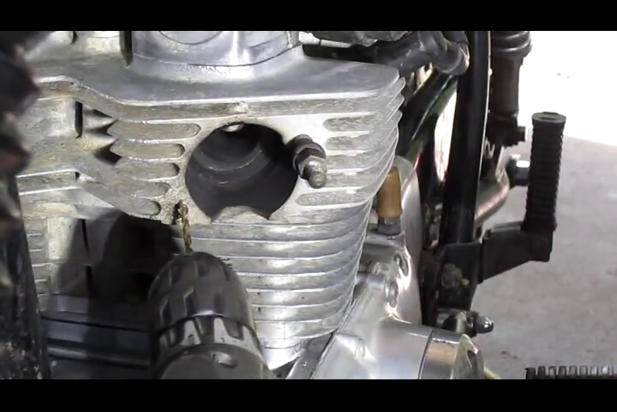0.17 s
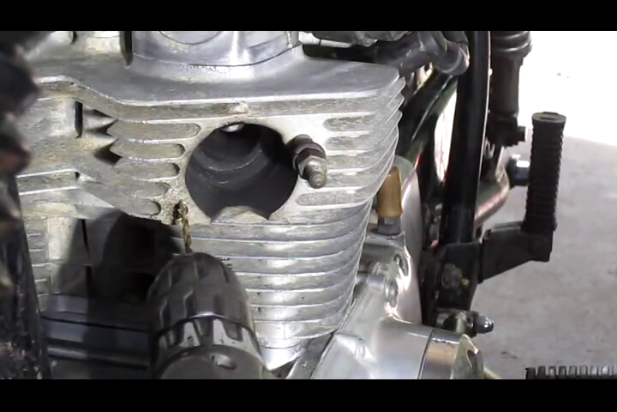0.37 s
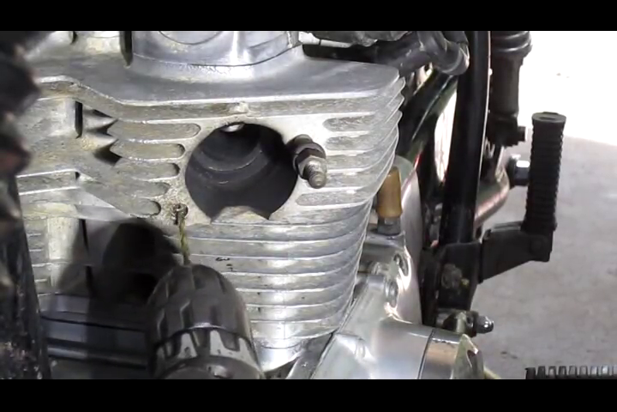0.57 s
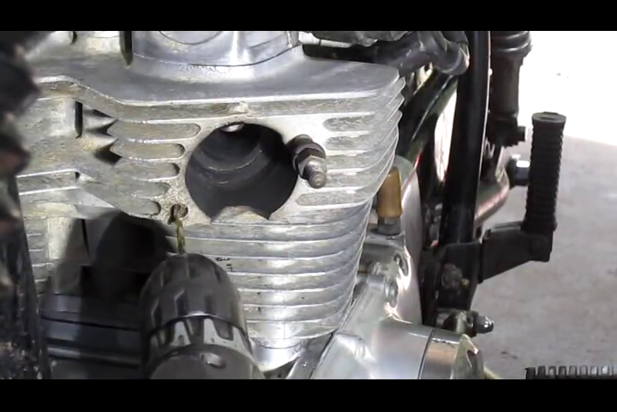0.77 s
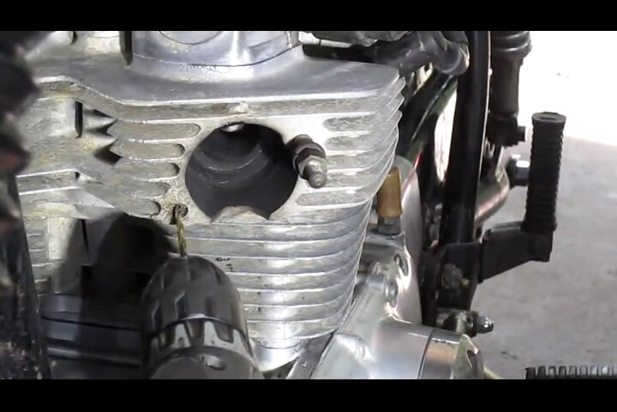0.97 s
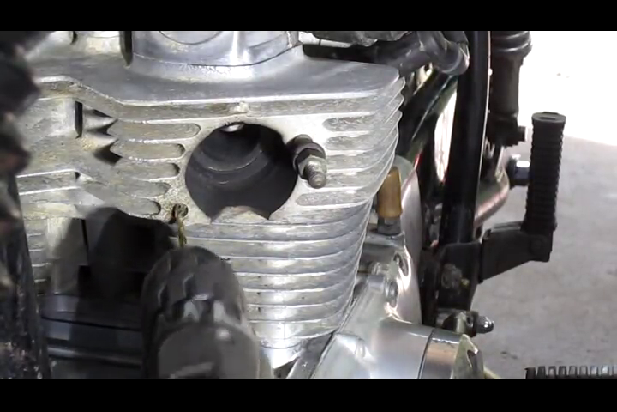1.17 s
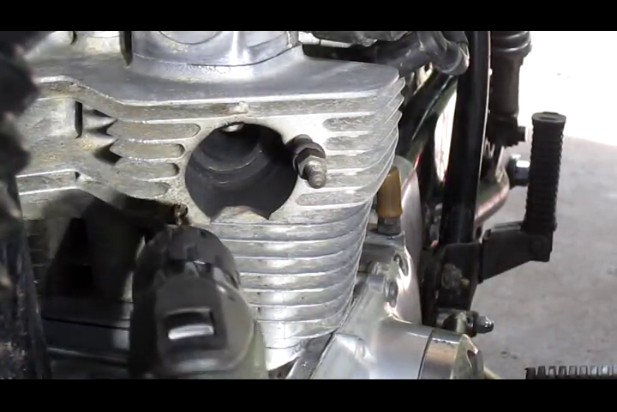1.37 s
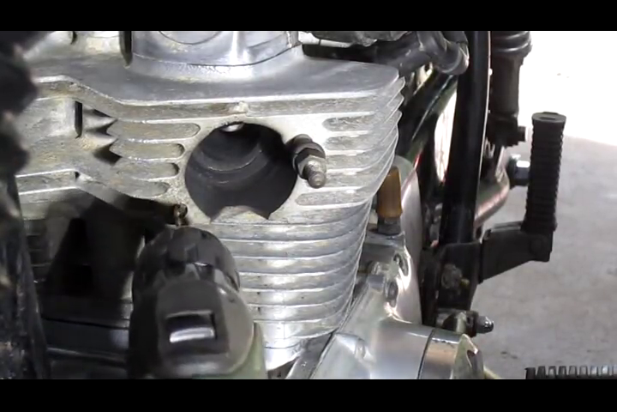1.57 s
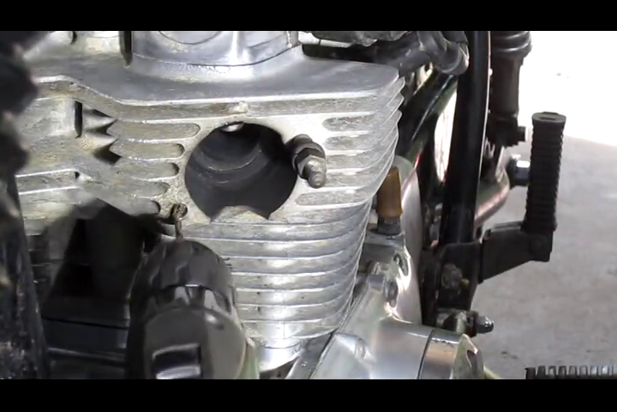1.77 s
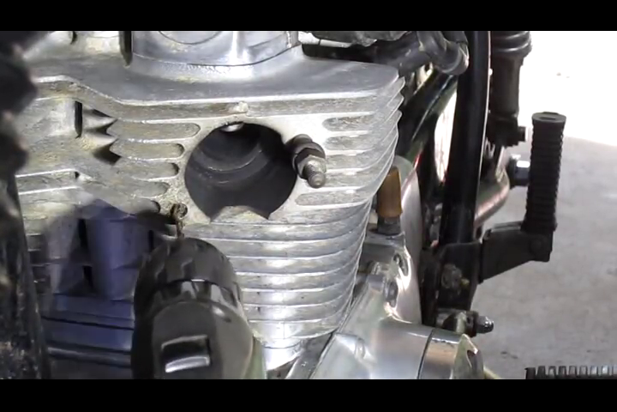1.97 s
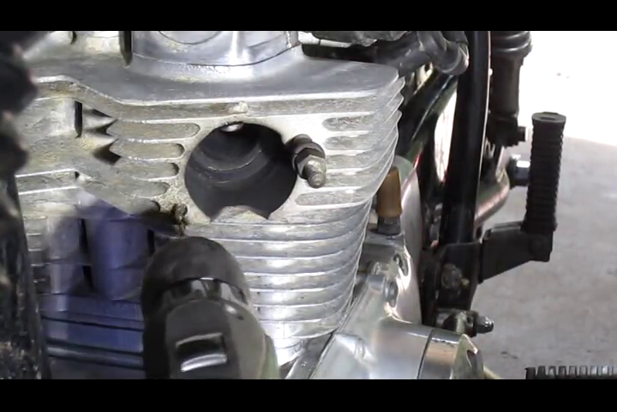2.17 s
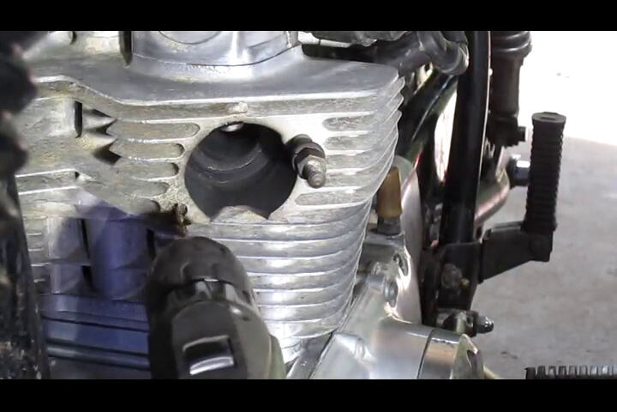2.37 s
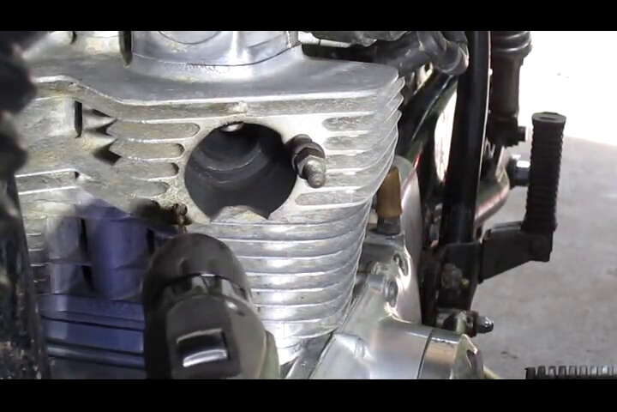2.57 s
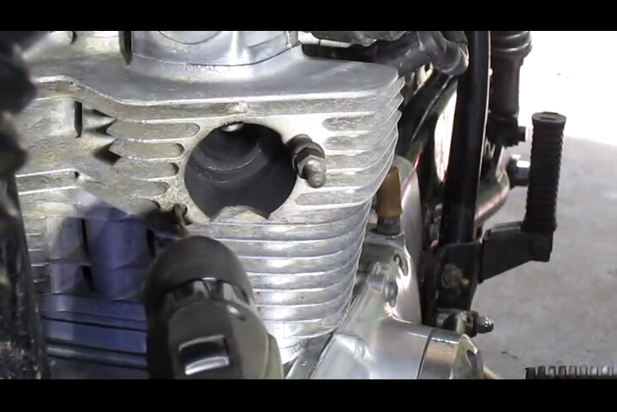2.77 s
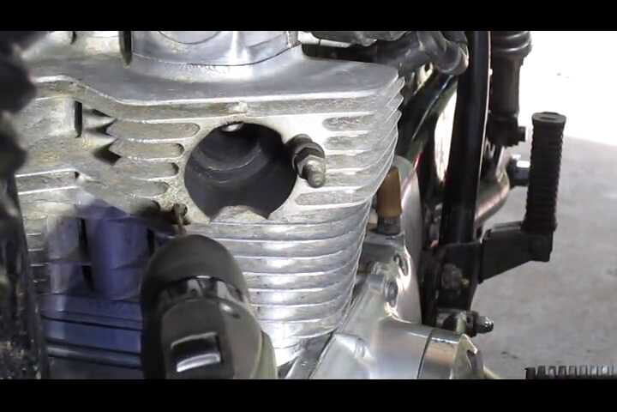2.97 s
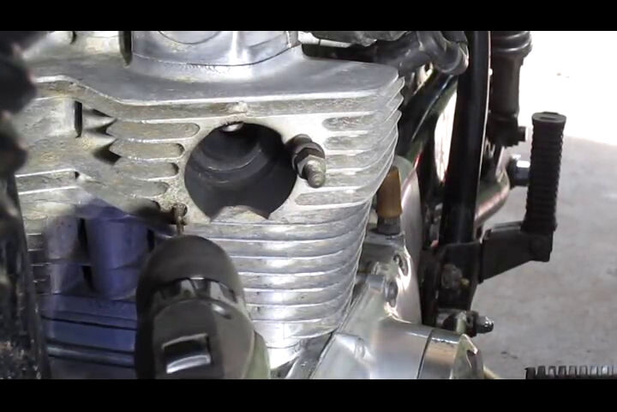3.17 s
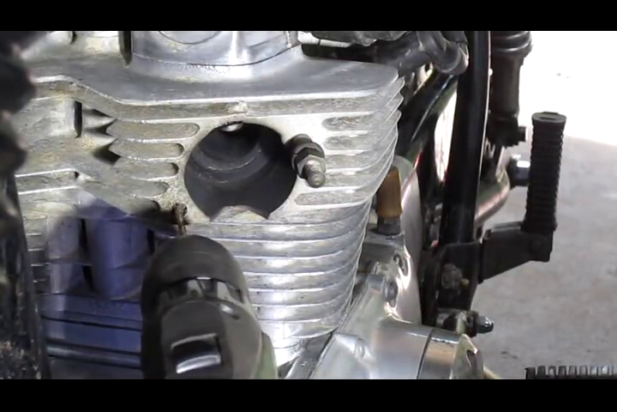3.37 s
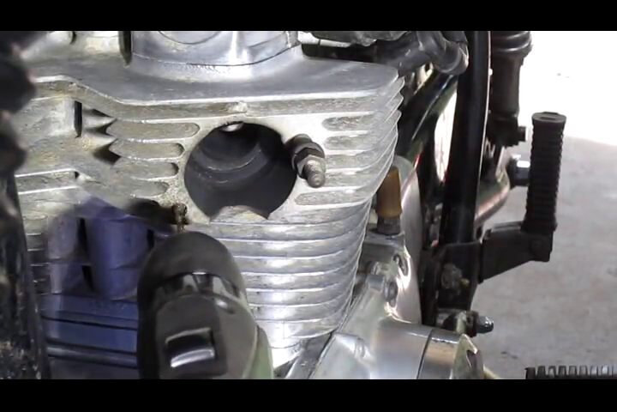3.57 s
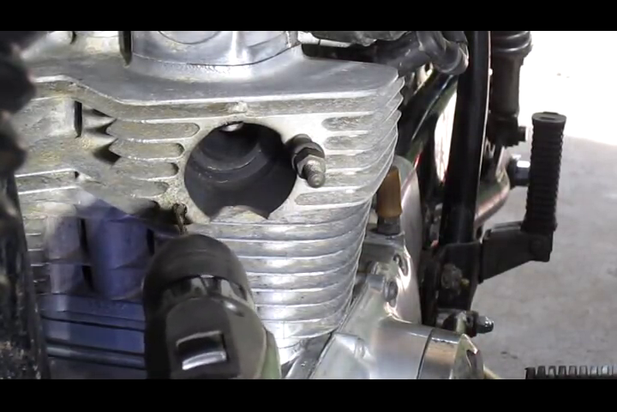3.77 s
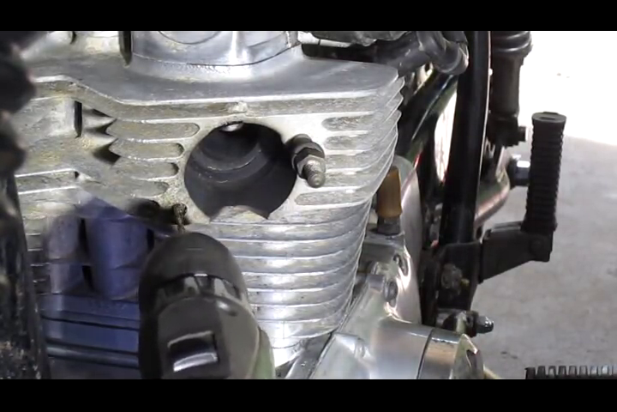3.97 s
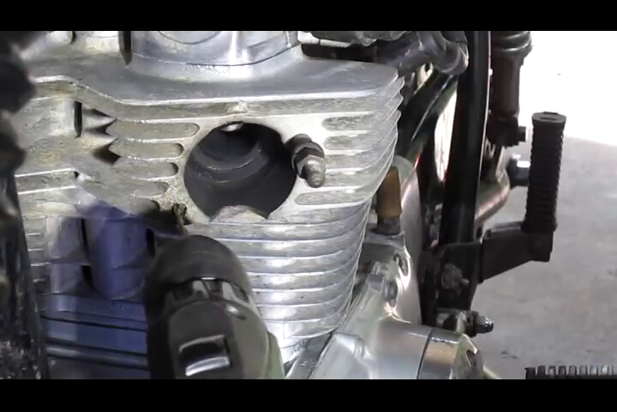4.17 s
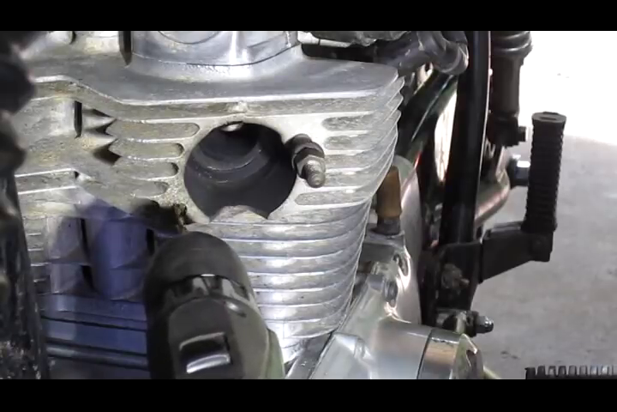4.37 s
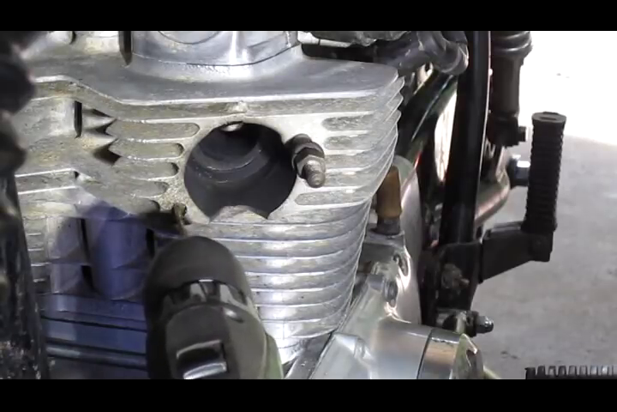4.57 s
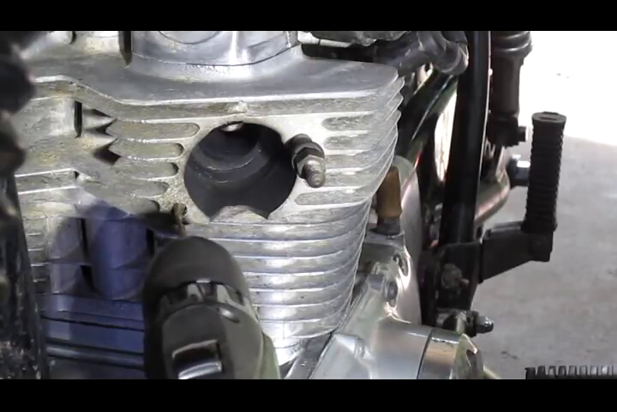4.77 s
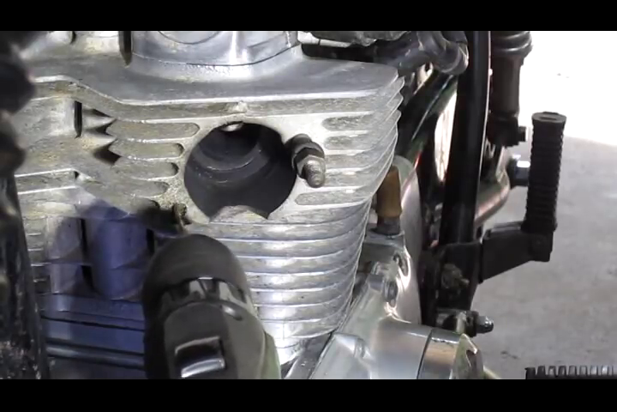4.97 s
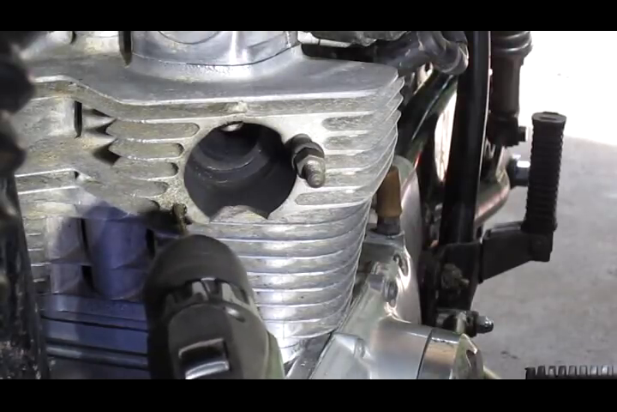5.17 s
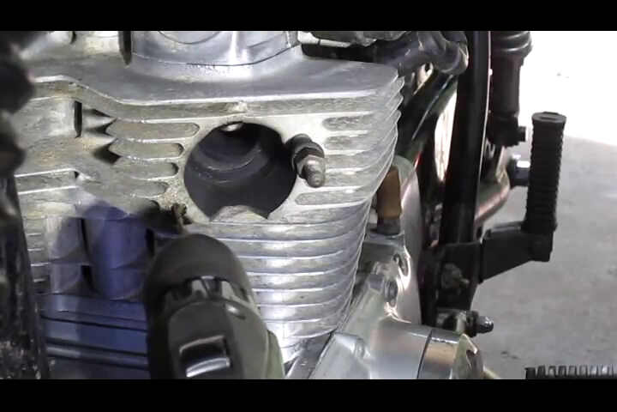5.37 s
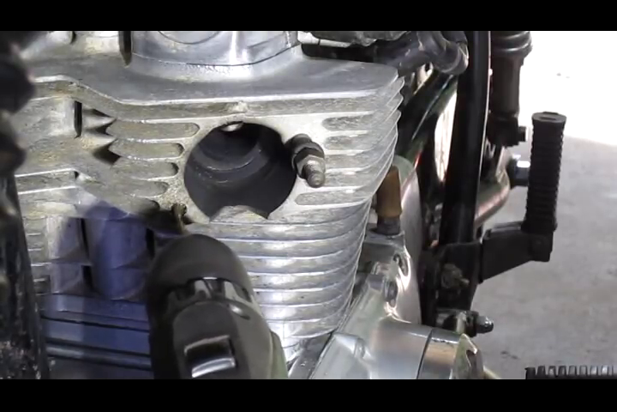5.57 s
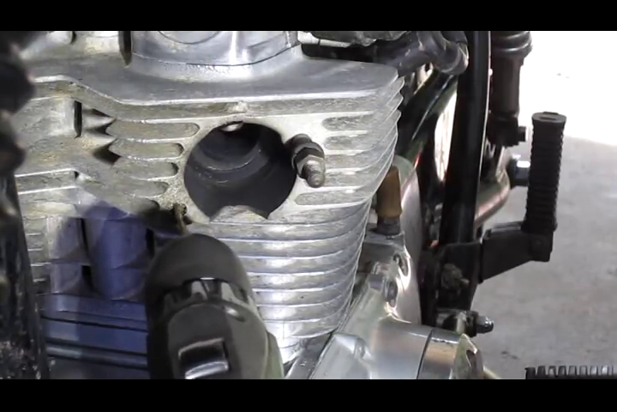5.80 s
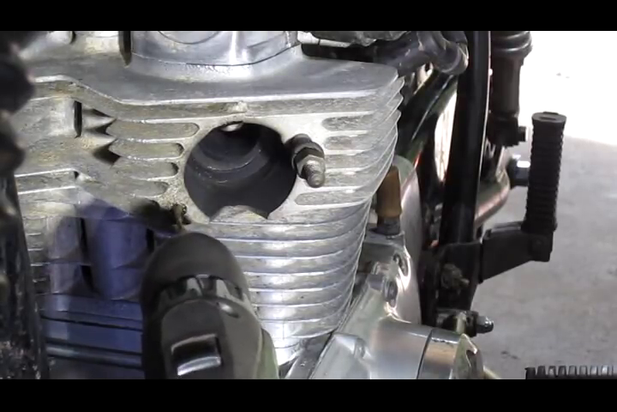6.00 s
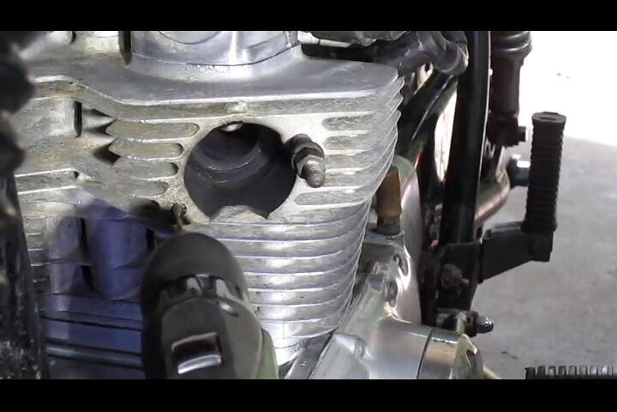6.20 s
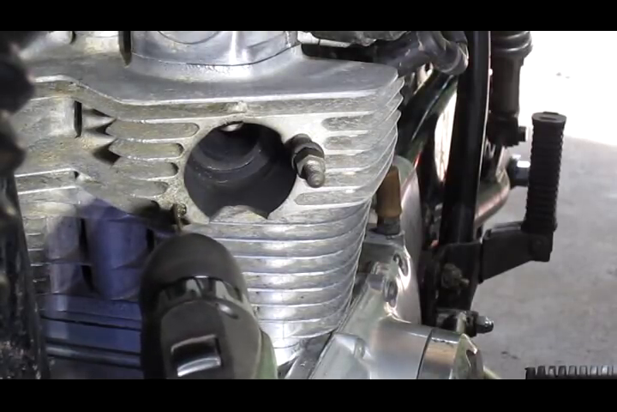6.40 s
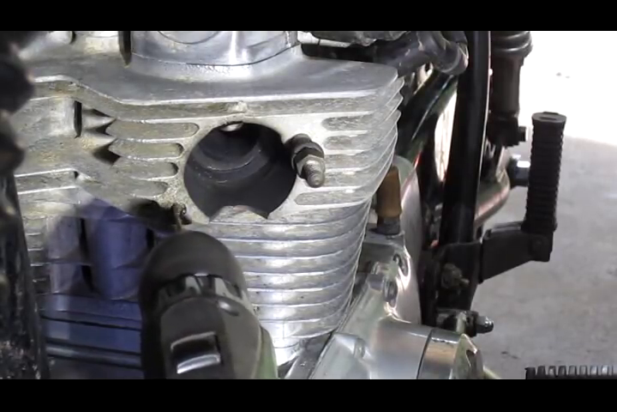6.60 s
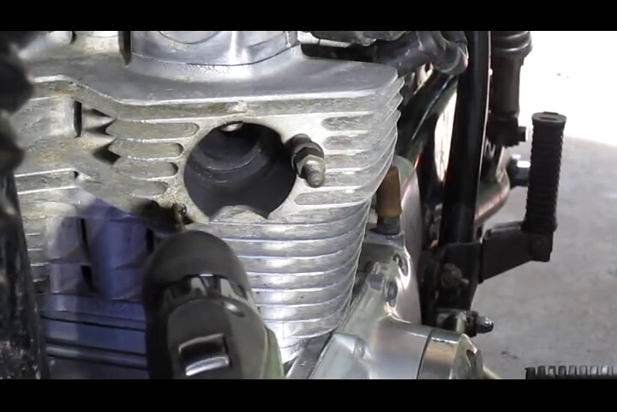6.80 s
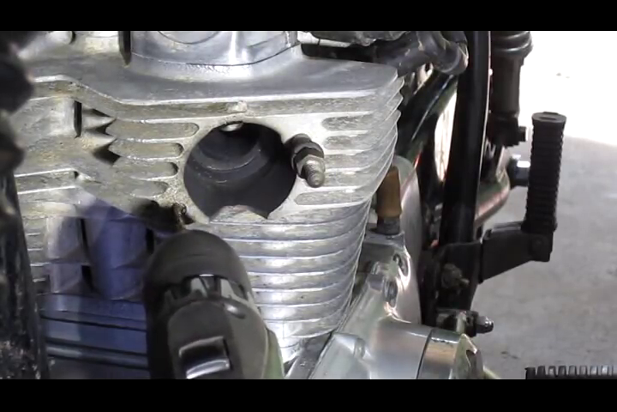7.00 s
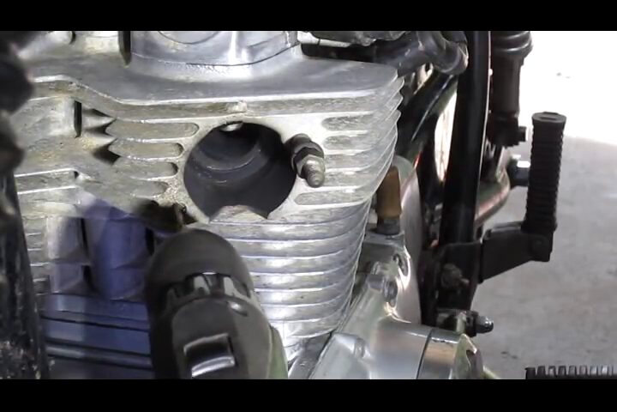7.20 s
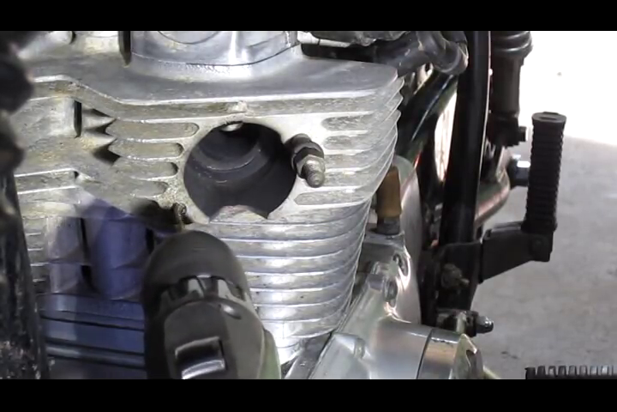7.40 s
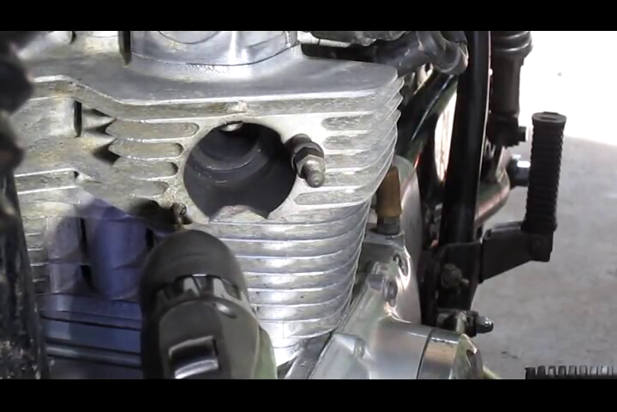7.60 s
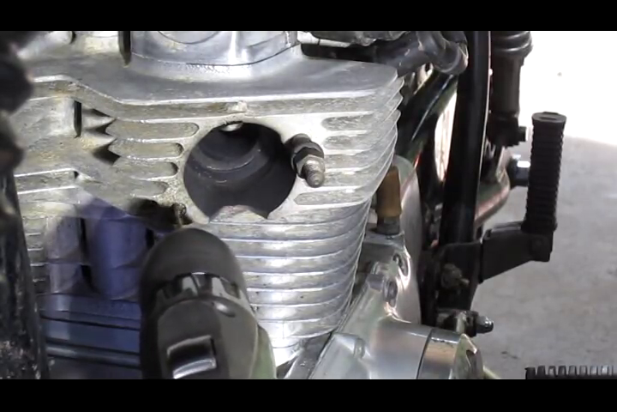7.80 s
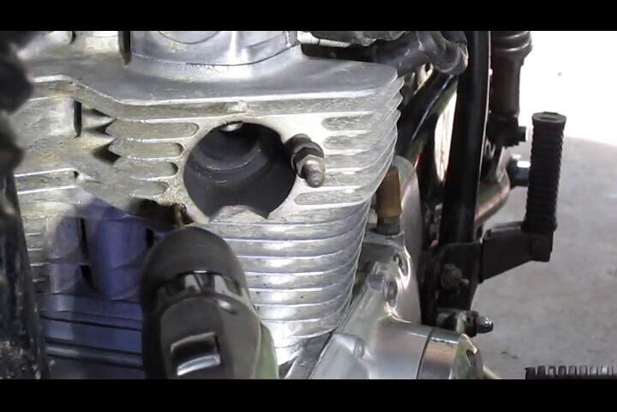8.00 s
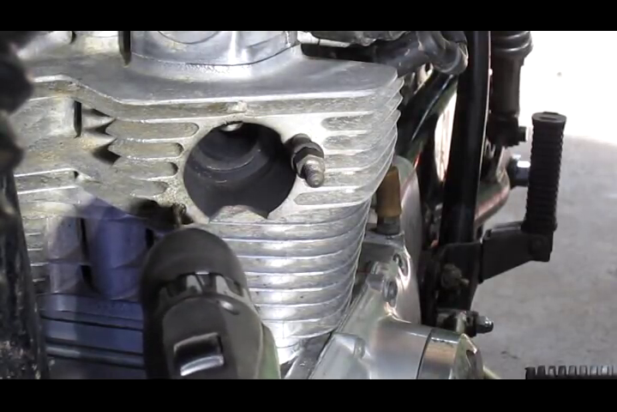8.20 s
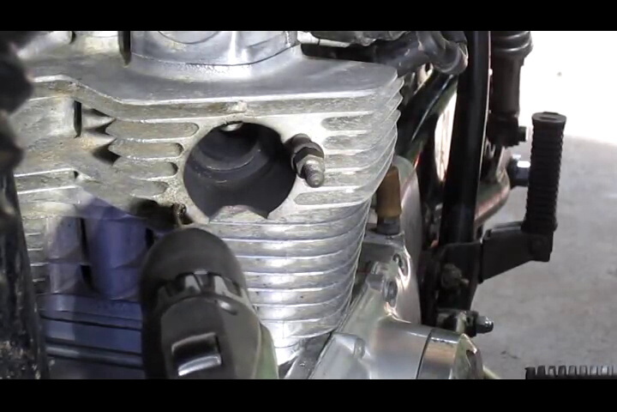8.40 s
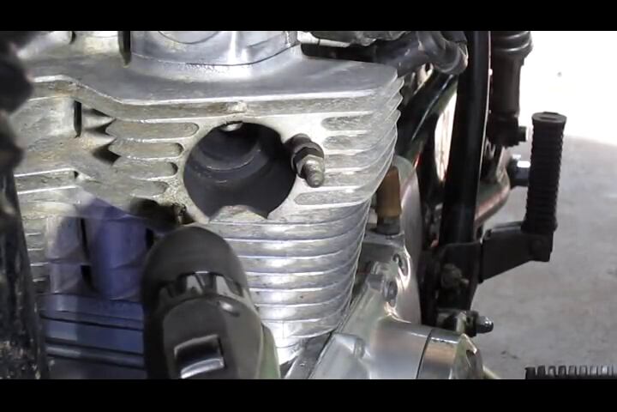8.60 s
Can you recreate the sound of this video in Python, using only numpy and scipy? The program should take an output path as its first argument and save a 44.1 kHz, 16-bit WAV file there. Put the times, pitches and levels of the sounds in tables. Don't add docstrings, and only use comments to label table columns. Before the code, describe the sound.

Close, dry outdoor sound of an electric drill on a seized steel stud in a finned engine head. Soft handling taps come first, then a thin high whine wavering as the bit binds and slips. It dips and restarts harder, harsh and hissing, with irregular clattering bites ringing the fins. A brief cut to silence leads into steady gritty grinding, rapidly pulsing, with crackling chips and late groans.

```python
import sys
import numpy as np
from scipy import signal
from scipy.fft import rfft, irfft, next_fast_len
from scipy.io import wavfile
from scipy.ndimage import uniform_filter1d, map_coordinates

SR = 44100
rng = np.random.default_rng(int(sys.argv[2]) if len(sys.argv) > 2 else 0)


def ratio_of_db(decibels):
    return 10 ** (np.asarray(decibels, float) / 20)


def wav_record(signal):
    frames = np.transpose(np.atleast_2d(signal))
    bounded = np.clip(frames, -1, 1)
    quanta = np.round(bounded * 32767).astype(np.int16)
    wavfile.write(sys.argv[1], SR, quanta)


N = 381465
T = np.arange(N) / SR

# (t/s, f/Hz, level/dB)
STEADY_PULL = [(2.9, 5456, -37.3), (2.94, 5470, -28.5), (3.1, 5518, -24.3), (3.28, 5547, -24.8),
               (3.31, 5585, -30.5), (4.41, 5590, -30.5)]
# (t/s, f/Hz, level/dB)
LOADED_PULL = [(4.79, 5280, -35), (4.86, 5360, -33.5), (5, 5371, -27.5), (5.2, 5390, -26),
               (5.3, 5386, -30.3), (5.75, 5375, -27), (6.0, 5377, -30), (6.08, 5380, -26.5),
               (6.51, 5400, -26)]
# (t/s, f/Hz, level/dB)
WHISTLE_PULLS = [
    [(2.03, 5150, -50), (2.06, 5080, -53), (2.28, 5090, -54), (2.32, 5085, -58), (2.4, 5140, -54),
     (2.43, 5060, -59)],
    [(2.683, 5510, -30), (2.705, 5500, -31)],
    [(2.683, 5600, -28), (2.705, 5700, -33)],
    [(2.715, 5670, -29), (2.735, 5656, -33), (2.75, 5540, -22), (2.783, 5430, -23), (2.83, 5360, -31),
     (2.85, 5410, -28), (2.86, 5300, -38), (2.87, 5370, -31), (2.881, 5400, -24)],
    STEADY_PULL,
    [(4.45, 5750, -32), (4.462, 5617, -25), (4.48, 5540, -35)],
    LOADED_PULL,
]
OCTAVE_DB = (-7.5, -35, -33, -31, -45, -35, -31)
RAGGED_DB = (1.5, 1, 1, 1.1, 0.98, 2.2, 0.3)
# (t/s, spacing f/Hz, level/dB)
COMMUTATOR = [(2.9, 149, -38), (3.2, 210, -25), (3.5, 264, -17), (4.4, 262, -19), (4.5, 262, -37)]
# (middle t/s, half length t/s, shift f/Hz)
LURCHES = [
    (3.35, .03, 35.5),
    (3.47, 0.053, -17.5),
    (3.68, 0.0447, 19),
    (3.83, 0.079, -31),
    (3.95, 0.025, 17.5),
    (4.07, .035, 84),
    (4.22, 0.078, -25.5),
    (4.42, 0.028, 31),
]
BIND_DB_PER_HZ, SLIP_DB_PER_HZ = 0.11, 0

# (t/s, level/dB)
EFFORT = [(2.0, -70), (2.63, -63), (2.69, -37), (2.76, -34.5), (2.85, -30.5), (3.04, -36.5), (3.2, -48),
          (3.35, -48.5), (3.58, -46), (4.41, -47), (4.44, -33), (4.52, -27), (4.9, -29.5), (6.5, -30.5)]
CRUISE_DB = -47
RATTLE_DB, RATTLE_GROWS = -35.5, 0.39
WHIRR_DB, WHIRR_GROWS, IDLE_WHIRR_DB = -51.5, 0.82, -62
ENGAGE_S, ENGAGE_RISE_S, SLACK_DB = 2.647, 0.0049, -9
# (middle t/s, half length t/s, level/dB)
JOLTS = [
    (2.72, 0.043, 3.5),
    (3.04, 0.025, 0.5),
    (3.6, 0.044, 2),
    (4.46, 0.051, 2.5),
    (4.62, 0.1, 1),
    (5.47, 0.043, -1),
    (5.62, 0.046, -3.5),
    (6.15, 0.6, 2),
]
JOLT_WHIRR = 0.47
# (f/Hz, width f/Hz, level/dB)
CASE_MODES = [(350, 120, -9.5), (559, 112, -6.5), (799, 137, 1.5), (1080, 405, -2), (1335, 274, 0),
              (1580, 180, 1.5), (2135, 840, -8.5)]
# (f/Hz, level/dB per Hz)
WHIRR_SPECTRUM = [(1180, -15), (2000, -6.5), (2990, -6), (3540, -1), (4270, -5), (5000, -6.5), (6500, -6),
                  (11000, -120)]
# (f/Hz, level/dB per Hz)
BRUSH_SPECTRUM = [(3350, -16.5), (5700, -0.5), (7300, -1), (8010, 2), (8750, -1), (9380, 0), (11300, -4.5),
                  (11900, -8), (13500, -17), (14300, -13), (15000, -22.5)]
# (t/s, f/Hz, level/dB)
MESH = [
    [(2.78, 482.5, -45), (2.83, 508, -40.5), (2.9, 509, -41), (2.94, 520, -64)],
    [(4.45, 350, -55), (4.5, 530, -40), (4.55, 602, -39), (4.66, 650, -36), (4.8, 653.5, -32),
     (4.85, 610, -43), (5.0, 497, -51)],
    [(5.01, 498, -54), (5.08, 514, -38.5), (5.6, 532, -44), (6.0, 519.5, -41), (6.5, 509, -40)],
]
MESH_THIRD_DB, MESH_THIRD_WIDTH_HZ = -8, 90

# (t/s, fin level/dB, small fin level/dB)
SNATCHES = [(4.48, -21, -23), (4.5023, -20, -18), (4.5318, -17.5, -35), (4.613, -16, -22),
            (4.6541, -17, -13.5), (4.6685, -18, -17), (4.7097, -19, -20), (4.7412, -11.5, -21),
            (4.8359, -18.5, -27), (4.8654, -18, -17), (4.917, -17.5, -28), (4.9706, -20.5, -22),
            (5.045, -17.5, -15), (5.1084, -16, -20), (5.174, -14, -17), (5.189, -14.5, -25),
            (5.2311, -16.5, -17), (5.2937, -17.5, -24), (5.3213, -26, -17), (5.3807, -16, -23),
            (5.4973, -15.5, -24), (5.5046, -20, -15), (5.5633, -17, -25), (5.7426, -13.5, -17),
            (5.8272, -18, -24), (5.9085, -17, -27), (5.9522, -27, -19), (6.0919, -17, -27),
            (6.1638, -16.5, -19), (6.4629, -11.5, -16)]
# (t/s, fin level/dB, small fin level/dB)
NIBBLES = [(4.4393, -27, -39), (4.471, -30, -26), (4.557, -28, -27), (4.583, -30, -20), (4.6894, -19, -23),
           (4.731, -22, -20), (4.76, -22, -28), (4.787, -28, -25), (4.8195, -21, -26), (5.0153, -22, -24),
           (5.0936, -18, -26), (5.1607, -21, -27), (5.2854, -22, -31), (5.4035, -27, -32),
           (5.451, -26, -25), (5.6591, -24, -32), (5.679, -26, -29), (5.7149, -22, -27), (5.768, -30, -23),
           (5.7967, -27, -22), (5.865, -28, -25), (6.0083, -26, -27), (6.0725, -26, -30), (6.112, -19, -28),
           (6.2023, -21, -23), (6.224, -23, -33), (6.3222, -21, -25), (6.361, -18, -32), (6.379, -23, -26),
           (6.405, -25, -26), (6.4208, -25, -23), (6.482, -22, -27)]
# (t/s, fin level/dB)
CATCHES = [(2.7297, -19.5), (2.8184, -20), (3.0457, -19.5), (3.415, -35), (3.4958, -34), (3.6269, -31),
           (3.709, -22), (3.7508, -36), (4.0494, -28), (4.093, -26.5), (4.143, -33), (4.1669, -36)]
CATCH_SMALL_DB = -19
# (f/Hz, width f/Hz, level/dB)
FIN_MODES = [(3970, 5500, -14.5), (7230, 230, -5), (8060, 140, 0.5), (9440, 530, 0), (10600, 1100, -10)]
# (f/Hz, width f/Hz, level/dB)
SMALL_FIN_MODES = [(12660, 860, 0.5), (12750, 370, 4.5), (13700, 500, -3), (14500, 1300, -15)]
RASP_SPAN, RASP_DB = (4.46, 6.5), -43
# (t/s, peak level/dB)
KNOCKS = [(4.423, -26), (4.443, -19), (4.468, -16.5), (4.502, -16), (4.653, -13.5), (4.689, -18.5),
          (4.732, -16.5), (4.916, -16.5), (4.97, -17), (5.014, -21), (5.036, -13.5), (5.173, -15),
          (5.228, -12), (5.318, -14), (5.339, -19), (5.38, -21), (5.401, -15), (5.451, -15), (5.48, -14.5),
          (5.68, -18), (5.714, -17), (5.848, -21), (5.869, -21), (5.907, -17), (5.95, -16), (6.092, -14),
          (6.112, -16), (6.16, -14), (6.284, -25), (6.305, -15.5), (6.413, -15.5), (6.453, -13.5)]
# (t/s, peak level/dB)
LIGHT_KNOCKS = [(2.651, -28), (2.784, -27), (2.867, -23), (3.032, -17), (3.156, -30), (3.372, -29),
                (3.405, -25), (3.552, -24), (3.625, -20.5), (3.688, -23), (3.751, -22), (3.969, -25),
                (4.001, -27), (4.094, -24.5), (4.141, -23), (4.425, -24)]
# (f/Hz, width f/Hz, level/dB)
GEARBOX_MODES = [(550, 220, -9), (803, 150, -4), (1180, 400, -11), (1577, 150, 4), (2290, 1400, -13.5)]
FIN_SCATTER_DB, CASE_SCATTER_DB = 3.5, 2.5
BLOW_S = .005
CASTING_DB, CASTING_HZ = 1.5, 45

# (from t/s, to t/s)
GAP = (6.5024, 6.526)
# (t/s, level/dB)
PRESSURE = [(6.53, -26), (6.9, -28), (7.4, -26.5), (7.75, -27.5), (8.2, -29.5), (8.4, -27.5), (8.5, -25.5),
            (8.65, -26.5)]
# (f/Hz, width f/Hz, level/dB)
GRIND_MODES = [(970, 200, -16.5), (1132, 63, -11.5), (1530, 434, -4), (1863, 870, -5), (2430, 366, -0.5),
               (3060, 286, -3), (3330, 420, -4.5), (4600, 550, -2), (4995, 350, -0.5), (5610, 520, -8),
               (6710, 160, -13)]
# (f/Hz, level/dB per Hz)
FIZZ_SPECTRUM = [(3820, -20), (6500, -6), (6840, -3.5), (7360, -6.5), (8810, -5), (9410, -8), (10400, -3.5),
                 (13300, -7), (15100, -1.5), (15600, -6.5)]
FIZZ_DB, FIZZ_GROWS = -32, 0.25
CHUCK_HZ, THROB_DB, THROB_GROWS_PER_S = 30.2, 3, 0.9
# (t/s, peak level/dB)
CHIPS = [(6.535, -9), (6.556, -24), (6.5964, -13), (6.6524, -21), (6.9454, -16), (6.9636, -18),
         (7.4155, -14), (7.4477, -13), (7.8321, -12), (8.0304, -24), (8.0631, -19), (8.108, -12),
         (8.1269, -25), (8.1424, -25), (8.322, -13), (8.3993, -20.5), (8.4544, -16)]
# (f/Hz, level/dB per Hz)
HUM_SPECTRUM = [(250, -43), (420, -16), (462, 0.5), (703, -4), (1300, -9), (1690, -35), (2860, -120)]
HUM_DB, HUM_FADE_DB_PER_S, HUM_LEAST_DB = -41.5, 9.5, -63
# (f/Hz, level/dB per Hz)
DRONE_SPECTRUM = [(18, -67), (30, -35), (135, -8), (168, -11.5), (221, -3.5), (420, -4), (550, -45),
                  (920, -120)]
# (t/s, f/Hz, level/dB)
ARMATURE = [(6.55, 145.9, -60.5), (7.0, 140, -51.5), (8.65, 132.1, -64.5)]
# (multiple of f, level/dB)
ARMATURE_ORDERS = [(1.64, -5.5), (2.5, -1.5)]
# (multiple of f, level/dB)
HUM_ORDERS = [(3.3, -9.5), (3.849, -21.5), (4.4, -9.5)]
# (f/Hz, level/dB)
RINGS = [(1500, -50), (2541, -57), (3262, -53), (4490, -54), (6621, -51), (14939, -56)]
# (t/s, f/Hz, level/dB)
WAVER = [(6.54, 1135, -49), (6.6, 1130, -49), (7.55, 1146, -53.5), (7.72, 1105, -55), (7.82, 1180, -54),
         (7.89, 1108, -53), (8.51, 1164, -55), (8.59, 1140, -45), (8.6, 1133, -65)]

# (t/s, peak level/dB, f/Hz, thump level/dB, bright tick level/dB)
TAPS = [
    (0.1294, -37, 1700, 11, -3),
    (.93, -43.5, 2200, 16, 1),
    (1.462, -31.5, 2240, -4, -3),
    (2.0508, -27.5, 2630, 2.5, -19),
]
TAP_THUMP_HZ = (413, 700, 1230, 804)
# (middle t/s, length t/s, f/Hz, width
# f/Hz, level/dB)
GROANS_AND_SWELLS = [(0.73, .12, 740, 150, -51), (2.0, .05, 9200, 200, -62), (2.503, 0.71, 5000, 300, -54.5),
                     (2.523, 0.3, 5200, 140, -55), (5.9, 0.33, 1580, 150, -37), (3.8, .7, 11000, 500, -68),
                     (8.57, 0.142, 14800, 1500, -35), (2.55, .24, 10200, 269, -63), (2.656, .008, 5500, 324, -40),
                     (2.671, .01, 6100, 300, -34), (3.086, 0.052, 3920, 200, -37.5), (3.6, 0.092, 147, 90, -42.5),
                     (3.64, .12, 85, 30.1, -48), (1.75, 1.3, 1100, 350, -54.5), (4.32, 0.06, 1400, 60, -39),
                     (3.63, .15, 330, 200, -47.5), (3.606, 0.141, 1370, 270, -34), (3.65, 0.07, 680, 120, -38),
                     (3.72, .09, 590, 120, -38), (6.378, 0.246, 223, 160, -42), (6.63, 0.239, 655, 100, -40),
                     (6.34, .2, 1580, 200, -34), (7.29, 0.014, 8400, 150, -30), (7.35, .012, 8270, 150, -34),
                     (7.876, 0.06, 2000, 400, -39), (8.57, 0.17, 3200, 600, -34.5), (8.07, .1, 2600, 400, -34),
                     (8.62, .2, 2350, 500, -36), (8.58, 0.17, 4200, 440, -35),
                     (2.018, .006, 5500, 200, -47),
    (2.028, .006, 4800, 200, -51),
    (3.497, .012, 10800, 200, -48),
]

# (f/Hz, level/dB per Hz)
AIR_SPECTRUM = [(71, -25), (120, -3.5), (161, -8), (213, -4.5), (259, -7), (451, -7.5), (539, -8.5),
                (595, -9), (711, -7), (1510, -11.5), (8080, -18.5), (13500, -35.5)]
AIR_DB = -46.5
# (t/s, level/dB)
BREEZE = [(0.0, -57.5), (4.85, -54.5), (6.32, -47.5), (6.5, -58)]
# (f/Hz, level/dB per Hz)
RUMBLE_SPECTRUM = [(12, -39), (20, -6), (59, 6), (108, 4), (130, -12), (160, -1), (210, -54), (350, -120)]
# (from f/Hz, to f/Hz, threshold level/dB)
TOP_BANDS = [(13781, 14470, -74), (14470, 15159, -61), (15159, 15848, -54.5), (15848, 22050, 0)]


def whistle():
    _, spacing, side_db = curves(COMMUTATOR)
    out, lurch = np.zeros(N), bumps(LURCHES)
    swell_db = -lurch * np.where(lurch < 0, BIND_DB_PER_HZ, SLIP_DB_PER_HZ)
    waver, ragged, flicker = 5 * wobble(150), wobble(70), 2.1 * wobble(40.9)
    hz, db, on = np.zeros((3, N))
    for pull, octave_db, ragged_db in zip(WHISTLE_PULLS, OCTAVE_DB, RAGGED_DB):
        gate, pull_hz, pull_db = curves(pull)
        pull_hz = uniform_filter1d(pull_hz, size=900) + lurch + waver
        pull_db = pull_db + swell_db
        gain = gate * ratio_of_db(pull_db + ragged_db * ragged)
        out += gain * (tone(pull_hz) + ratio_of_db(octave_db + flicker) * tone(2 * pull_hz))
        hz, db, on = np.where(gate > 0, [pull_hz, pull_db, gain], [hz, db, on])
    gap = spacing - .5 * (hz - 5590)
    lower = tone(hz - gap + 8 * wobble(90))
    upper = 0.37 * tone(hz + gap + 25 * wobble(80))
    side_gain = ratio_of_db(side_db + 3.5 - np.clip(db + 34.0, 0, 8) + 1.5 * wobble(40.3))
    skirt = ratio_of_db(-20) * fuzz(hz - 80, 180)
    return out + on * (side_gain * (lower + upper) + skirt)


def first_pass():
    _, hiss_db = curves(EFFORT)
    extra_db = hiss_db - CRUISE_DB
    jolt_db = bumps(JOLTS)
    slack = np.clip(1 - (T - ENGAGE_S) / ENGAGE_RISE_S, 0, 1)
    rattle_db = RATTLE_DB + RATTLE_GROWS * extra_db + jolt_db + SLACK_DB * slack
    whirr_db = np.maximum(WHIRR_DB + WHIRR_GROWS * extra_db + JOLT_WHIRR * jolt_db, IDLE_WHIRR_DB)
    shake = wobble(35)
    rattle = unit(filtered(ratio_of_db(0.6 * shake) * gritty(200, 0.55), modes(CASE_MODES)))
    whirr = unit(filtered(ratio_of_db(0.91 * shake) * gritty(300, 0.84), casting(shape(WHIRR_SPECTRUM))))
    hiss = unit(filtered(ratio_of_db(0.88 * shake) * gritty(400, 1.2), casting(shape(BRUSH_SPECTRUM))))
    noises = ratio_of_db(rattle_db - 2) * rattle + ratio_of_db(whirr_db + 2.0) * whirr + ratio_of_db(hiss_db - 0.5) * hiss
    mesh = 0
    for stretch in MESH:
        on, hz, db = curves(stretch)
        hz = hz + 6 * wobble(40)
        pair = ratio_of_db(db - 1.5 + 1.8 * wobble(15)) * (tone(hz) + .5 * tone(2 * hz))
        third = ratio_of_db(db + MESH_THIRD_DB + 4.2 * wobble(18)) * fuzz(3 * hz, MESH_THIRD_WIDTH_HZ)
        mesh = mesh + on * (pair + third)
    return (T > EFFORT[0][0]) * noises + mesh


def snatches():
    catches = [(s, db, db + CATCH_SMALL_DB) for s, db in CATCHES]
    s, fin_db, small_db = np.vstack([SNATCHES, catches, NIBBLES]).T
    bite = [(0, 0.0003, 0.007), (-7, 0.0023, 0.039)]
    fins = struck(s, fin_db - 4.5, bite, FIN_MODES, FIN_SCATTER_DB)
    small_fins = struck(s, small_db - 6.5, bite, SMALL_FIN_MODES, FIN_SCATTER_DB)
    rasp = ratio_of_db(RASP_DB) * unit(filtered(gritty(120, 4.3), modes(SMALL_FIN_MODES)))
    rasp = rasp * (T > RASP_SPAN[0]) * (T < RASP_SPAN[1])
    knock_s, knock_db = np.vstack([KNOCKS, LIGHT_KNOCKS]).T
    slams = struck(knock_s, knock_db - 9, [(0, 0.0012, 0.028)], GEARBOX_MODES, CASE_SCATTER_DB)
    return fins + small_fins + rasp + slams


def second_pass():
    _, grind_db = curves(PRESSURE)
    since = np.maximum(T - GAP[1], 0)
    hum_db = np.maximum(HUM_DB - HUM_FADE_DB_PER_S * since, HUM_LEAST_DB)
    fizz_db = FIZZ_DB + FIZZ_GROWS * (grind_db + 27.5)
    throb_db = THROB_DB + THROB_GROWS_PER_S * since
    turn = np.cumsum(CHUCK_HZ + .8 * wobble(4.7)) / SR % 1
    throb = np.exp(-turn / 0.27) * (1 + 0.3 * np.tanh(wobble(14)))
    hum = ratio_of_db(hum_db - 1.5) * unit(filtered(gritty(40, 0.74), shape(HUM_SPECTRUM)))
    drone = ratio_of_db(-55.0) * unit(filtered(gritty(28, 0.58), shape(DRONE_SPECTRUM)))
    grind = unit(filtered(ratio_of_db(1.7 * throb) * gritty(500, 2.8), casting(modes(GRIND_MODES))))
    fizz = unit(filtered(ratio_of_db(throb_db * throb) * gritty(600, 1.5), casting(shape(FIZZ_SPECTRUM))))
    cutting = ratio_of_db(grind_db - 1.5) * grind + ratio_of_db(fizz_db + 1.04) * fizz
    chips = filtered(bursts(*np.transpose(CHIPS), .0002, 0.0076), shape(FIZZ_SPECTRUM))
    gate, hz, db = curves(ARMATURE)
    lines = ratio_of_db(1.6 * wobble(11)) * tone(hz + 1.2 * wobble(16))
    lines += sum(ratio_of_db(level) * fuzz(k * hz, 25) for k, level in ARMATURE_ORDERS)
    fading = 0
    for k, level in HUM_ORDERS:
        fading = fading + ratio_of_db(hum_db + level + 2.5 * wobble(10)) * tone(k * (hz + .7 * wobble(15)))
    rings = sum(ratio_of_db(level) * fuzz(ring_hz, 60) for ring_hz, level in RINGS)
    _, waver_hz, waver_db = curves(WAVER)
    wavering = ratio_of_db(waver_db - 2.5 + 2.6 * wobble(16)) * tone(waver_hz + 5 * wobble(30))
    return hum + drone + cutting + chips + gate * ratio_of_db(db) * lines + fading + rings + wavering


def handling():
    out, t = np.zeros(N), np.arange(1500) / SR
    for (s, db, hz, thump_db, _), thump_hz in zip(TAPS, TAP_THUMP_HZ):
        ring = np.sin(2 * np.pi * hz * t) + ratio_of_db(thump_db) * np.sin(2 * np.pi * thump_hz * t)
        out[round(s * SR):][:len(t)] += ratio_of_db(db - 5 - 60 * t / 0.022) * ring
    s, db, *_, tick_db = np.transpose(TAPS)
    contact = modes([(2200, 3000, 0)])
    out += filtered(bursts(s, db + 8.0, 0.00034, 0.015), lambda f: contact(f) ** 2)
    tick = modes([(8850, 2700, 3), (14000, 4000, -12)])
    out += filtered(bursts(s, db + tick_db + 7, 0.00017, 0.007), tick)
    for s, length, hz, width, db in GROANS_AND_SWELLS:
        near = abs(T - s) < length
        swell = np.cos(np.pi * np.clip((T[near] - s) / length / 2, -.5, .5)) ** 2
        rough = np.where(length * 50 < 1, 1, unit(wobble(width)[near]))
        out[near] += ratio_of_db(db) * swell * rough * tone(hz + 0 * swell)
    return out


def outdoors():
    hush = ratio_of_db(AIR_DB + 0.31 * wobble(4.7)) * unit(filtered(gritty(15, 0.73), shape(AIR_SPECTRUM)))
    line = ratio_of_db(-65) * tone(7850 + 35 * wobble(200))
    breeze = ratio_of_db(curves(BREEZE)[1]) * unit(filtered(gritty(7.9, 0.67), shape(RUMBLE_SPECTRUM)))
    return hush + line + breeze


def struck(times, dbs, shapes, rows, scatter_db):
    out, t = np.zeros(N + 2048), np.arange(900) / SR
    envelope = sum(ratio_of_db(db - 60 * t / t60) * (1 - np.exp(-t / rise)) for db, rise, t60 in shapes)
    hz = np.fft.rfftfreq(2048, 1 / SR)
    for s, db in zip(times, dbs):
        noise = rng.standard_normal(len(t))
        spread = scatter_db * rng.standard_normal(len(rows))
        body = modes([(c, w, level + d) for (c, w, level), d in zip(rows, spread)])(hz)
        blow = irfft(rfft(envelope * noise * abs(noise) ** .5, 2048) * body)
        out[round(s * SR):][:2048] += ratio_of_db(db) * blow * np.sqrt(BLOW_S * SR) / np.linalg.norm(blow)
    return out[:N]


def bursts(times, dbs, rise, t60):
    out, t = np.zeros(N), np.arange(900) / SR
    envelope = 1 - np.exp(-t / rise)
    for s, db in zip(times, dbs):
        noise = rng.standard_normal(len(t))
        out[round(s * SR):][:len(t)] += ratio_of_db(db - 60 * t / t60) * envelope * noise * abs(noise) ** .5
    return out


def modes(rows):
    def response(f):
        total = 0
        for k, (centre, width, db) in enumerate(rows):
            damping = 1j * f * width
            total = total + (-1) ** k * ratio_of_db(db) * damping / (centre * centre - f * f + damping)
        return total
    return response


def casting(response):
    ripple = rng.standard_normal(int(SR / 2 / CASTING_HZ) + 4)
    return lambda hz: response(hz) * ratio_of_db(CASTING_DB * map_coordinates(ripple, [hz / CASTING_HZ]))


def shape(points):
    f, v = np.transpose(points)
    return lambda hz: ratio_of_db(np.interp(np.log(hz + 1), np.log(f), v))


def filtered(x, response):
    m = next_fast_len(N + 8192)
    return irfft(rfft(x, m) * response(np.fft.rfftfreq(m, 1 / SR)), m)[:N]


def gritty(rate, depth_db):
    return ratio_of_db(depth_db * wobble(rate)) * rng.standard_normal(N)


def fuzz(hz, width):
    return unit(wobble(width)) * tone(hz + 0 * T)


def tone(hz):
    return np.sqrt(2) * np.sin((2 * np.pi * (np.cumsum(hz) / SR % 1)).astype(np.float32))


def wobble(rate):
    coarse = T[::8]
    knots = rng.standard_normal(int(N * rate / SR) + 4)
    return np.interp(T, coarse, map_coordinates(knots, [coarse * rate]))


def bumps(rows):
    return sum(size * np.exp(-((T - s) / half) ** 2) for s, half, size in rows)


def curves(rows):
    s, *cols = np.transpose(rows)
    gate = np.clip(np.minimum(T - s[0], s[-1] - T) * 200 + 1, 0, 1)
    return [gate] + [np.interp(T, s, c) for c in cols]


def unit(x):
    return x / np.sqrt(np.mean(x ** 2) + 1e-20)


def scene():
    before, after = T < GAP[0], T > GAP[1]
    first = whistle() + first_pass() + snatches() + outdoors()
    return (first * before + second_pass() * after + handling() * (before | after))[None]


def roll_off(x):
    return signal.sosfilt(signal.butter(12, 16930, fs=SR, output="sos"), x)


def record(dry):
    lead, frame = 144, dict(window="cosine", nperseg=2048)
    hz, _, z = signal.stft(np.pad(dry, ((0, 0), (lead, 0))), SR, **frame)
    for lo, hi, floor_db in TOP_BANDS:
        band = (hz >= lo) & (hz < hi)
        power = np.sum(abs(z[:, band]) ** 2, axis=1, keepdims=True) * 2
        z[:, band] *= power > ratio_of_db(2 * floor_db)
    kept = signal.istft(z, SR, **frame)[1][:, lead:lead + N]
    kept = kept * ((T < GAP[0]) | (T > GAP[1]))
    return roll_off(kept)


dry = scene()
out = record(dry)
wav_record(out)
```